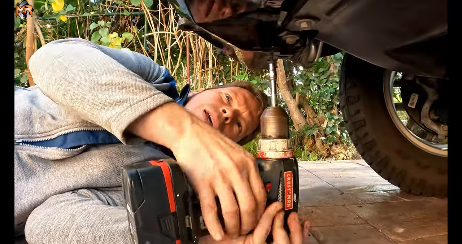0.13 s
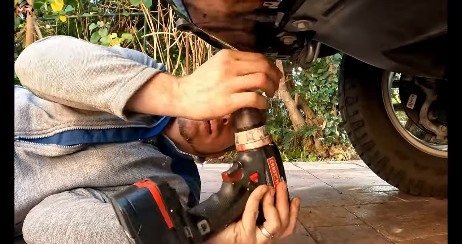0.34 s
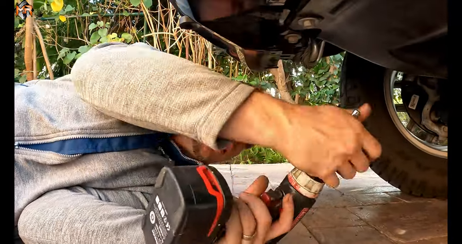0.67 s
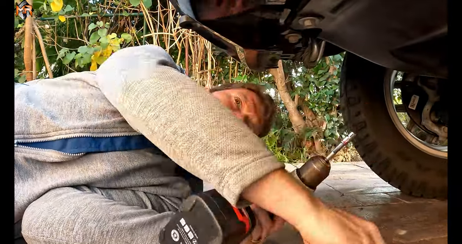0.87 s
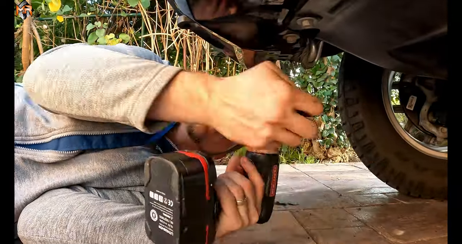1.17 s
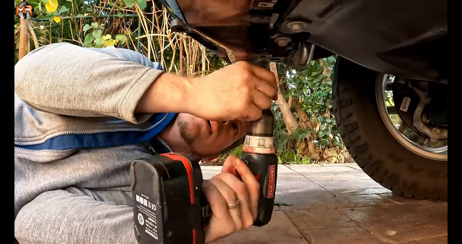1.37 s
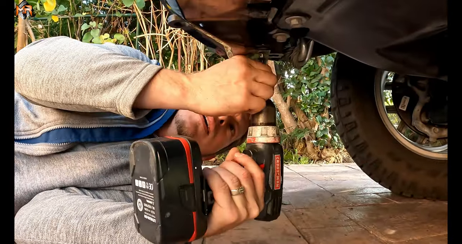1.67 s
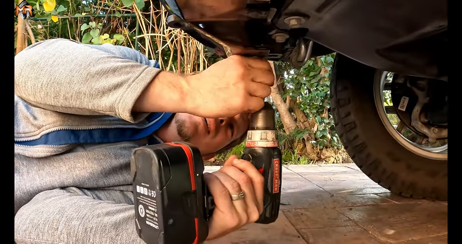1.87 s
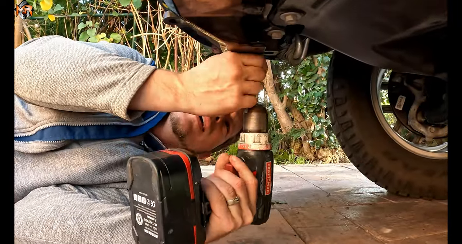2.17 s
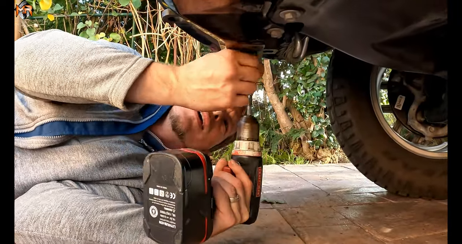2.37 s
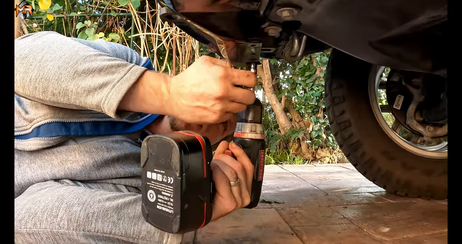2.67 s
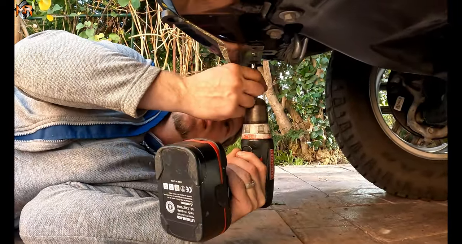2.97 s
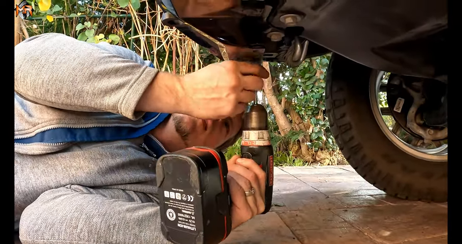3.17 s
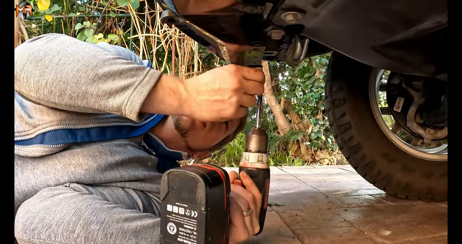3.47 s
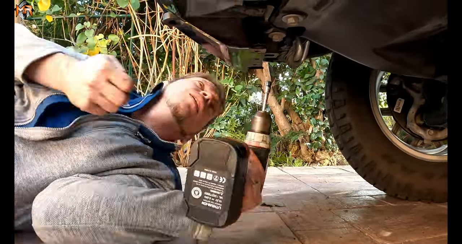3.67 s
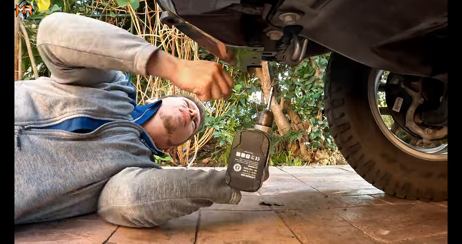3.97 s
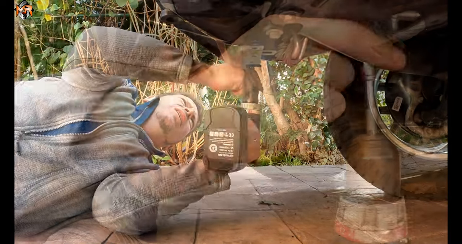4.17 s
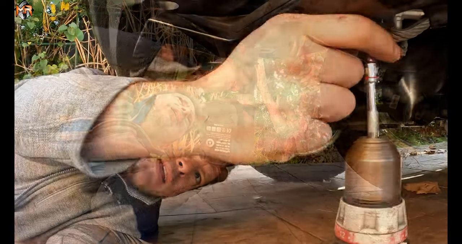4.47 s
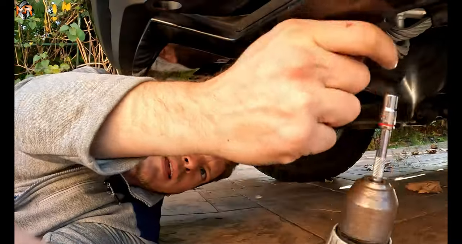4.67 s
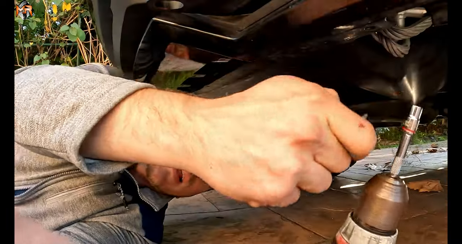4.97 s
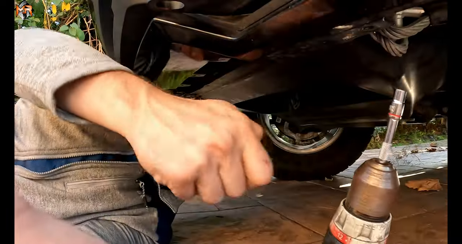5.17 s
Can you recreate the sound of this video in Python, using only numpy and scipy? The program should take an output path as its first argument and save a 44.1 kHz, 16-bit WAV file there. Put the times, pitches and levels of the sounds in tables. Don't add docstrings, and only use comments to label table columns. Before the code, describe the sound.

Outdoors on paving under a vehicle, a drill already spinning cuts off quickly, then hands knock socket and metal while wind rumbles. Two more short, whining bursts follow with clicks and hollow thumps. The view dissolves from a fast, smeared stereo distance to a close microphone, where a longer burst swells, brakes and coasts down before a bolt rattles sharply.

```python
import sys
import numpy as np
from scipy import signal
from scipy.fft import rfft, irfft, next_fast_len
from scipy.io import wavfile
from scipy.ndimage import uniform_filter1d, map_coordinates

SR = 44100
rng = np.random.default_rng(int(sys.argv[2]) if len(sys.argv) > 2 else 0)


def voltage_ratio(decibels):
    exponent = np.asarray(decibels, float) / 20
    return 10 ** exponent


def to_wav(sig):
    pcm = np.clip(np.atleast_2d(sig), -1, 1) * 32767
    pcm = np.round(pcm).astype(np.int16)
    wavfile.write(sys.argv[1], SR, pcm.T)


N = 234908
TIME = np.arange(N) / SR
FAST = next_fast_len(N)

SCENE_CHANGES_S = (1.27, 4.01)
DISSOLVE_S = (3.98, 4.06)
# start_s, left_minus_right_db, wind_left_minus_right_db
BALANCE = [(0.0, -0.5, 2), (3.41, -0.5, -8.5), (3.56, -0.5, -17.5), (3.84, -0.5, -11), (4.17, -2.5, -2),
           (4.81, -1.5, -0.5), (5.33, 0, -3)]
# freq_hz, left_minus_right_db
STEREO_TILT = [(300, 3), (600, 1), (1200, 1), (3000, -1), (9000, 2)]
# start_s, end_s, remaining_db
DROPOUTS = [
    (1.1413, 1.180, -80),
    (4.6722, 4.706, -64),
]

# start_s, end_s, start_level_db, end_level_db, upper_over_deep_db
GUSTS = [(0, 0.325, -52, -59.5, 7.5), (0.33, 1.156, -50.5, -57, 5), (1.168, 1.261, -53.5, -55.5, -2),
         (1.449, 1.709, -80, -68, -20.5), (1.69, 1.95, -73, -73, -23), (1.943, 2.22, -82, -86, -22),
         (2.44, 2.518, -88, -71, -19), (2.507, 2.621, -70, -69, 0), (2.635, 2.727, -84, -83, 0),
         (2.882, 3.313, -87, -67, 20), (3.3, 3.65, -86.5, -75, 28.5), (3.657, 4.06, -60.5, -69, 12),
         (4.05, 4.508, -67.5, -57.5, 14.5), (4.51, 4.82, -55, -53.5, 5), (4.813, 5.34, -50.5, -49, 6)]
# freq_hz, density_db_per_hz
DEEP_BUFFET = [(12, -46), (20, -0.5), (45, 5), (67, 7), (110, -6.5), (140, -16), (240, -120)]
UPPER_BUFFET = [(56, -61), (95, -1), (138, 1.5), (183, -3), (260, -16.5), (340, -19.5), (570, -120)]

# start_s, level_db
YARD_STIR = [(.24, -55.5), (.37, -71), (.82, -73.5), (1.13, -78), (1.22, -74.5), (1.4, -87), (1.68, -80),
             (2.36, -68), (2.48, -82), (2.64, -86), (2.79, -78), (3.04, -66.5), (3.58, -62), (3.83, -70.5),
             (4.05, -68.5), (4.95, -59), (5.06, -69.5), (5.33, -69.5)]
# freq_hz, density_db_per_hz
RUSTLE = [(200, -96.5), (470, -59), (800, -21), (1370, -13.5), (1570, -15.5), (1800, -17), (2500, -26.5),
          (3250, -36), (5500, -120)]
AIR = [(600, -71), (1350, -36), (2300, -2), (2720, -6.5), (3140, -0.5), (4080, -6), (5570, -3.5),
       (7010, -8), (11400, -20), (13600, -23), (15400, -50)]
MURK = [(70, -100), (150, -44), (250, -23), (394, -13.5), (515, -13.5), (663, -18), (900, -47), (1170, -43),
        (1980, -120)]
TRAFFIC = [(300, -61), (420, -8), (520, 5), (620, -11), (900, -63)]

# start_s, level_db, pitch_hz, t60_s
HOLLOW_THUMPS = [(1.645, -44, 419, 0.1), (1.675, -49, 421, 0.081), (1.96, -44, 418, 0.081),
                 (2.3, -50, 439, 0.058), (2.35, -53.5, 444, 0.065), (2.51, -50, 136, 0.17),
                 (2.68, -67, 378, 0.18), (4.49, -41.5, 305, 0.13), (4.72, -40, 433, 0.1),
                 (1.825, -63.5, 193, 0.21), (1.9, -61.5, 438, 0.63), (2.1, -50.5, 394, 0.14),
                 (2.86, -43, 377, 0.12), (2.88, -61, 143.4, 0.32), (3.05, -55, 375, 0.21),
                 (3.245, -37, 195, 0.11), (3.255, -40.5, 148.5, 0.24), (3.42, -42, 262, 0.16),
                 (3.47, -42.5, 436, 0.093), (3.657, -29.5, 141.7, 0.16), (3.74, -54.5, 80.3, 1),
                 (3.907, -35, 135, 0.28), (3.93, -42.5, 76, 0.66), (4.59, -36.5, 328, 0.12),
                 (4.65, -29.5, 312.5, 0.16), (5.074, -27, 610, 0.032), (5.076, -29.5, 432, 0.039),
                 (3.905, -49, 542, 0.12), (3.905, -50.5, 340, 0.13), (3.92, -43, 940, 0.066),
                 (2.68, -70, 232, 0.1), (2.69, -65, 85, 0.093), (4.2, -53.5, 143, .4), (4.42, -39, 137, .3),
                 (4.55, -47, 724, 0.089), (4.6, -39.5, 755, 0.082)]
# start_s, level_db, t60_s
SOCKET_RINGS = [
    (.4, -69, 0.086),
    (0.457, -36, 0.043),
    (.497, -43.5, 0.13),
]
# peak_s, level_db, centre_hz, length_s, treble_over_body_db
STEEL_TICKS = [(.397, -37.5, 2610, 0.0049, -0.5), (.462, -44.5, 3580, 0.0057, 3),
               (.503, -60, 4030, 0.012, 6), (.662, -51.5, 4130, 0.032, -2), (.685, -46.5, 2650, 0.0091, -1),
               (.755, -48.5, 3600, 0.0092, -8), (.949, -58, 2330, 0.027, -1),
               (1.049, -69, 4850, .022, 10.5), (1.362, -77, 4570, 0.018, 7), (1.485, -74, 3070, 0.013, -3),
               (1.797, -58, 3600, 0.018, -2), (2.322, -49, 3300, 0.0088, 2),
               (2.528, -49.5, 2250, 0.008, -4), (2.585, -76, 4000, 0.0091, 7),
               (2.645, -68, 3930, 0.015, -1), (2.803, -67, 7600, .004, 0), (2.848, -48, 3740, 0.0045, -4.5),
               (2.857, -37.5, 2890, 0.0023, -9.5), (3.536, -34.5, 2350, 0.027, -1.5),
               (3.755, -62, 5030, .008, -11), (3.975, -49.5, 4570, 0.021, -5.5),
               (4.045, -48.5, 4130, 0.0057, -9), (4.772, -44, 3120, 0.0064, -10),
               (3.097, -31.5, 3600, 0.0044, -21), (5.255, -56, 6300, 0.03, -12),
               (5.194, -58, 1300, .004, -25)]
BOLT_CLACKS = [(.102, -32, 1600, 0.0099, -29), (.132, -30.5, 1230, 0.0098, -15),
               (.159, -32, 1870, 0.012, -8), (.288, -38.5, 1470, 0.0045, -7.5),
               (.317, -39, 1430, 0.0076, -18), (.357, -37.5, 1340, 0.0085, -19),
               (.415, -50, 2370, 0.0056, -25), (.783, -42.5, 1510, 0.009, -10),
               (.801, -52.5, 2860, 0.0041, -5.5), (1.829, -33.5, 2660, 0.03, -39),
               (2.877, -38.5, 1870, 0.011, -42), (2.892, -50, 2000, 0.019, -33),
               (2.911, -43.5, 2660, 0.0022, -30), (2.918, -43, 1860, 0.016, -20),
               (3.06, -38.5, 2020, 0.013, -30), (3.656, -34.5, 2170, 0.027, -23),
               (3.907, -39.5, 2320, 0.037, -19.5), (4.725, -32, 4050, 0.071, -9.5)]
CHASSIS_BUMPS = [(.068, -31.5, 2000, 0.014, -8), (.279, -47, 1790, 0.0073, -3),
                 (.298, -35, 2500, 0.0039, -21), (.592, -59, 1190, 0.018, -3),
                 (.615, -55.5, 2500, 0.04, -2), (1.649, -50, 1350, 0.011, -4),
                 (1.68, -46, 1480, 0.012, -29), (1.741, -68, 2270, 0.0082, -3),
                 (2.69, -60.5, 2000, 0.027, -30), (3.83, -63.5, 1800, 0.031, -22),
                 (4.887, -41.5, 1770, 0.017, -18), (5.081, -56, 966, 0.014, -24)]
SOCKET_SNAPS = [(2.418, -44, 3600, 0.003, -11), (2.442, -55.5, 2130, 0.017, -4.5),
                (2.483, -59.5, 3370, 0.0075, -10), (2.547, -37, 2000, 0.01, -16),
                (2.615, -61, 1730, 0.049, -6), (2.739, -57, 2740, 0.0031, -17),
                (2.747, -42, 2000, 0.0057, -23), (2.82, -57.5, 1510, 0.019, -23),
                (3.43, -40, 1220, 0.018, -20), (3.46, -36.5, 3000, 0.018, -15),
                (3.487, -33.5, 2400, 0.007, -26)]
# freq_hz, density_db_per_hz
KNOCK_TREBLE = [(2650, -15), (4500, 6), (5040, 1), (6520, 6), (8700, -4), (9900, -1.5), (11700, -6),
                (13600, -12.5), (15400, -37.5)]
# start_s, level_db
CLINKS = [(5.103, -67), (5.1254, -64), (5.2137, -38), (5.2228, -33.5), (5.2305, -44), (5.2358, -46),
          (5.249, -47), (5.2587, -54), (5.2648, -49)]
# pitch_hz, level_db, t60_s
BOLT_MODES = [(4450, -12, .015), (4800, -9, .015), (6450, -6, .045), (7400, -12, .02)]
# freq_hz, density_db_per_hz
CLINK_CRACK = [(700, -43), (1500, -20), (3000, -7), (4500, -3), (6500, 2.5), (7700, -2), (9000, -17),
               (12000, -21), (15000, -49)]

# start_s, end_s
RUNNING = [
    (0, .29),
    (1.75, 2.43),
    (3.01, 3.66),
    (3.98, 5.18),
]
# time_s, shaft_hz
SHAFT_SPEED = [
    [(0, 262), (.128, 250)],
    [(1.805, 190), (1.88, 206), (1.95, 209), (2.01, 228), (2.05, 238), (2.1, 243), (2.17, 245), (2.21, 241),
     (2.25, 224)],
    [(3.045, 184), (3.1, 228), (3.2, 238), (3.24, 248), (3.28, 250), (3.5, 248.4)],
    [(3.99, 237), (4.08, 242), (4.3, 246), (4.4, 249), (4.5, 251), (4.64, 252.5), (4.711, 253)],
]
# gear_level_db, attack_s, sag_db_per_s, coasting_hum_db
BURSTS = [
    (-32.5, 0.00067, 63, -46),
    (-31.5, 0.042, 13.5, -68),
    (-31, 0.063, 14.5, -71),
    (-35.5, 0.35, -3.5, -42),
]
# shaft_multiple, level_db
TOP_TEETH = [
    (28, -14),
    (29, -6),
    (28, -7),
    (28, -15),
]
# shaft_multiple, level_db
TOOTH_WHINE = [(5, -20), (8, -23), (12, -2), (13, -20), (15, -11.5), (16, -21), (20, -19)]
LOW_HUM = [(4, -4), (8, -5), (12, -2), (16, -1)]
# time_s, level_db
SINGING = [(0, -55), (.13, -65), (1.8, -68), (1.9, -54), (2.0, -44), (2.2, -38.5), (2.28, -63), (3.04, -70),
           (3.19, -45), (3.26, -41), (3.47, -46), (3.53, -58), (3.99, -71), (4.03, -63.5), (4.2, -53),
           (4.42, -40), (4.67, -33), (4.8, -54)]
# freq_hz, density_db_per_hz
GEARS_FAR = [(200, -100), (470, -31), (900, -19.5), (1010, -10.5), (1250, -9.5), (1560, -13), (2510, -4.5),
             (3690, -2), (4300, -9.5), (5590, -6.5), (7200, -12), (9000, -24.5), (11700, -63),
             (19800, -120)]
GEARS_NEAR = [(470, -24), (800, -21.5), (1220, -6.5), (1350, -10), (1970, -3), (2540, -5.5), (2920, -1.5),
              (3540, -3), (7130, -9), (9000, -29), (11700, -78), (19800, -120)]
BRUSHES = [(4590, -20.5), (7800, -9.5), (8970, -12), (10200, 0.5), (11000, -7), (12000, -1), (13100, -16.5),
           (14200, -18), (14900, -28), (15100, -45), (15400, -53.5)]
HOUSING_DRONE = [(140, -69.5), (230, -2.5), (324, -6.5), (415, -0.5), (510, -1.5), (543, -5.5), (880, 0),
                 (1140, -0.5), (1940, -120)]
# pitch_hz, width_hz, level_db
FIRST_CASING = [(2120, 29, -6), (3100, 200, -4), (3320, 36, -0.5), (3870, 92, -6), (5040, 58, -21),
                (5270, 41, -2.5), (5540, 44, 0), (6850, 120, -9), (7250, 100, -11)]
SECOND_EARLY = [(2130, 40, -2), (2500, 70, -2), (3190, 72, -1), (3600, 27, -18), (3940, 77, -11),
                (4550, 67, 0), (4840, 58, 5), (5870, 260, -13), (7730, 170, -19)]
SECOND_LATE = [(2500, 61, 1), (3420, 47, 3), (3600, 76, -10), (3980, 33, -1), (4960, 64, -3),
               (5460, 31, -16), (5850, 200, -6.5), (7230, 200, -2.5)]
THIRD_EARLY = [(2460, 37, 1), (2520, 40, 0), (2870, 36, -6), (3450, 68, 4.5), (3780, 60, 3.5),
               (4980, 170, -5), (5450, 86, -23), (6230, 130, -9), (7050, 120, -18)]
THIRD_LATE = [(2000, 94, -6), (2470, 50, -7), (2740, 30, -6), (3360, 62, 3.5), (3590, 24, -10.5),
              (4700, 93, -4.5), (5040, 110, -9.5), (5500, 50, 1), (5730, 50, 1.5), (7530, 82, -7)]
COAST_POWER = 1.785


def unit(x):
    return x / np.sqrt(np.mean(x ** 2) + 1e-20)


def along(points, hz):
    f, v = np.transpose(points)
    return np.interp(np.log(hz + 1), np.log(f + 1), v)


def curves(rows):
    s, *cols = np.transpose(rows)
    return [np.interp(TIME, s, c) for c in cols]


def by_scene(values):
    return np.asarray(values)[np.searchsorted(SCENE_CHANGES_S, TIME)]


def nearness():
    return np.interp(TIME, DISSOLVE_S, [0, 1])


def wobble(rate):
    return map_coordinates(rng.standard_normal(int(N * rate / SR) + 4), [TIME * rate])


def noise(spectrum, size=FAST):
    white = rfft(rng.standard_normal(size))
    colour = voltage_ratio(along(spectrum, np.fft.rfftfreq(size, 1 / SR)))
    return unit(irfft(white * colour, size)[:N])


def field(shape, bins, frames):
    smooth = uniform_filter1d(rng.standard_normal(shape), bins, 0)
    return unit(uniform_filter1d(smooth, frames, 1))


def patchy(x, patchy_db):
    z = signal.stft(x, nperseg=2048, noverlap=1536)[2]
    z = z * voltage_ratio(patchy_db * field(z.shape, bins=2, frames=7))
    return unit(signal.istft(z, nperseg=2048, noverlap=1536)[1][:N])


def loosened(x, fast_rad, near_rad, bins, tilt=((1, 0),), frames=36):
    f, t, z = signal.stft(x, SR, nperseg=1024, noverlap=768)
    drift = np.interp(t, DISSOLVE_S, [fast_rad, near_rad]) * field(z.shape, bins, frames)
    lean = voltage_ratio(along(tilt, f)[:, None] / 2) * np.exp(1j * drift)
    return signal.istft(z * np.array([lean, 1 / lean]), nperseg=1024, noverlap=768)[1][:, :N]


def lasting(start, end):
    edge_s = .03
    return np.clip(np.minimum(TIME - start, end - TIME) / edge_s + .5, 0, 1) ** 2


def wind():
    deep = upper = voltage_ratio(-104)
    for start, end, start_db, end_db, tilt_db in GUSTS:
        gust = lasting(start, end) * voltage_ratio(np.interp(TIME, [start, end], [start_db, end_db]))
        deep = deep + gust * voltage_ratio(-tilt_db / 2)
        upper = upper + gust * voltage_ratio(tilt_db / 2)
    lumps = voltage_ratio(1.6 * wobble(27))
    deep_noise = unit(lumps * noise(DEEP_BUFFET))
    upper_noise = unit(lumps * patchy(noise(UPPER_BUFFET), patchy_db=2.0))
    return deep * deep_noise + upper * voltage_ratio(-7.0) * upper_noise


def yard():
    stir_db, = curves(YARD_STIR)
    sleeve_s, sleeve_db, fall_db_per_s = 5.17, -56.5, 14
    sleeve = lasting(sleeve_s, 2 * sleeve_s) * voltage_ratio(sleeve_db - fall_db_per_s * (TIME - sleeve_s))
    rustle = patchy(noise(RUSTLE), patchy_db=4.0)
    air = patchy(noise(AIR), patchy_db=-2.5)
    murk_level = voltage_ratio(stir_db + by_scene((-2.5, -13.5, 0))) + voltage_ratio(-14) * sleeve
    traffic = lasting(1.284, 1.515) * voltage_ratio(-87) * noise(TRAFFIC)
    stir = voltage_ratio(stir_db) * (rustle + voltage_ratio(-0.5) * air) + murk_level * noise(MURK) + traffic
    return voltage_ratio(1.7 * wobble(17)) * (stir + sleeve * rustle)


def rings(table, attack):
    distant_end_s = 4.012
    out = np.zeros(N)
    for s, db, hz, t60 in table:
        t = np.clip(TIME - s, 0, None)
        lasts = np.clip((distant_end_s - TIME) / 0.011, 0, 1) if s < distant_end_s else 1
        level = voltage_ratio(db - 60 * t / t60 + 2.2 * wobble(27))
        out += lasts * level * (1 - np.exp(-t / attack)) * np.sin(2 * np.pi * hz * t)
    return out


def knocks(table, low_db):
    size, lead = 4096, 1024
    low_colour = [(220, -61.0), (380, 9.5), (560, 9), (800, 10.5), (1100, -29)]
    out = np.zeros(N + size)
    t = (np.arange(size) - lead) / SR
    for s, db, hz, length, treble_db in table:
        body = noise([(150, -90), (600, -40), (900, -12), (max(hz * 0.43, 920), -6), (hz, 0), (hz * 1.5, -6),
                      (max(hz * 1.1, 5200), -17), (max(hz * 2, 7000), -40)], size)
        modes_hz = hz * np.exp(rng.normal(0, .15, 4))
        clank = sum(np.sin(2 * np.pi * (f * t + p)) for f, p in zip(modes_hz, rng.random(4)))
        mix = body + voltage_ratio(-13.5) * np.exp(-np.abs(t) / .008) * clank
        mix += voltage_ratio(treble_db) * noise(KNOCK_TREBLE, size) + voltage_ratio(low_db) * noise(low_colour, size)
        swell = np.exp(-np.abs(t / (length * np.where(t < 0, .45, .7))) ** 1.07)
        strike = .8 * np.exp(-(t / .0025) ** 2)
        echo = voltage_ratio(-33.5) * np.exp(-np.abs(t) / 0.073) * (t > 0)
        out[round(s * SR) - lead:][:size] += voltage_ratio(db - 5.5) * (swell + echo + strike) * mix
    return out[:N]


def clinks():
    size = 4096
    out, t = np.zeros(N + size), np.arange(size) / SR
    for s, db in CLINKS:
        ring = np.zeros(size)
        for hz, level_db, t60 in BOLT_MODES:
            ring += voltage_ratio(level_db + rng.normal(0, 2.5) - 60 * t / t60) * np.sin(2 * np.pi * hz * t)
        crack_and_rasp = voltage_ratio(-60 * t / 0.0045) + voltage_ratio(-14 - 60 * t / 0.075)
        crack = noise(CLINK_CRACK, size) * crack_and_rasp
        out[round(s * SR):][:size] += voltage_ratio(db) * (voltage_ratio(-2.5) * ring + crack)
    return out[:N] * voltage_ratio([[0.5], [-0.5]])


def running():
    return uniform_filter1d(sum(1. * (TIME >= a) * (TIME < b) for a, b in RUNNING), size=600)


def drive():
    driven, = curves(sum(SHAFT_SPEED, []))
    press, release = np.transpose([(c[0][0], c[-1][0]) for c in SHAFT_SPEED])
    release_hz = np.array([c[-1][1] for c in SHAFT_SPEED])
    which = np.clip(np.searchsorted(press, TIME) - 1, 0, None)
    db, attack, sag, hum_db = np.array(BURSTS)[which].T
    coast_s = np.array((.1, .095, .085, .18))[which]
    since = np.clip(TIME - press[which], 0, None)
    after = np.clip(TIME - release[which], 0, None)
    swell_db = 1.213 * 20 * np.log10(1.001 - np.exp(-since / attack))
    level_db = db - sag * (since - after) + swell_db
    speed = np.where(after > 0, release_hz[which], driven)
    hum_db = np.where(after > 0, hum_db, -120)
    return speed, np.exp(-after / coast_s), level_db, np.array(TOP_TEETH)[which].T, hum_db


def motor():
    driven, left, _, (top_order, top_db), hum_db = drive()
    bite = np.clip(TIME - 4.718, 0, None) / .03
    bite = bite * np.exp(1 - bite)
    drag = by_scene((.15, 0, .1))
    coasting = np.clip((1 + drag) * left ** by_scene((.8, 1, .905)) - drag, .01, 1)
    speed = driven * coasting * (1 - .1 * bite)
    whine_db = curves(SINGING)[0] + 6 * bite - 3.1 * np.clip(168 - speed, 0, None)
    hum_db = hum_db - by_scene((30, 13, 6)) * np.log(speed / 110) ** 2
    hum_db = hum_db - .45 * np.clip(speed - 170, 0, None)
    shaken = speed * (1 + by_scene((.003, .002, .0007)) * wobble(40))
    turn = 2 * np.pi * np.cumsum(shaken) / SR
    rotor = voltage_ratio(0.4 * whine_db - 39 + 1.5 * wobble(25)) * (speed > 180) * np.sin(2 * turn)
    out = nearness() * rotor
    top_db = top_db - 20 * np.log10(1 + (2 * (top_order * speed - 7050) / 300) ** 2)
    breaks_db = by_scene((2.5, 1.3, .6))
    for order, db in TOOTH_WHINE + [(top_order, top_db)]:
        out += voltage_ratio(whine_db + db + breaks_db * wobble(45)) * np.sin(order * turn)
    cavity_hz, cavity_width_hz = 420, 330
    for order, db in LOW_HUM:
        cavity = 1 / (1 + (2 * (order * speed - cavity_hz) / cavity_width_hz) ** 2) ** 2
        hum = np.sin(order * turn + 0.2 * wobble(36))
        out += cavity * voltage_ratio(hum_db + db + 2.4 * wobble(37)) * hum
    return running() * out


def casing():
    f = np.fft.rfftfreq(FAST, 1 / SR)
    white = rfft(rng.standard_normal(FAST))
    sets = (FIRST_CASING, SECOND_EARLY, SECOND_LATE, THIRD_EARLY, THIRD_LATE)
    alone_s = (.3, 1, 1.1, 1.95, 2.08, 2.7, 2.8, 3.18, 3.32)
    out = np.zeros(N)
    for table, share in zip(sets, np.eye(len(sets))):
        modes = sum(voltage_ratio(db) / (1 + (2 * (f - c) / w) ** 2) for c, w, db in table)
        fade = np.sqrt(np.interp(TIME, alone_s, np.repeat(share, [2, 2, 2, 2, 1])))
        out += fade * unit(irfft(white * modes, FAST)[:N])
    return out


def gears():
    near = nearness()
    chatter = voltage_ratio(2.2 * wobble(700) + .8 * wobble(150) + .25 * wobble(40))
    far_mesh = patchy(noise(GEARS_FAR) + voltage_ratio(-6) * casing(), patchy_db=-0.94)
    near_mesh = patchy(noise(GEARS_NEAR), patchy_db=2.5)
    mesh = unit(chatter * ((1 - near) * far_mesh + near * near_mesh))
    hiss = unit(chatter * noise(BRUSHES))
    drone = unit(voltage_ratio(1.6 * wobble(38)) * patchy(noise(HOUSING_DRONE), patchy_db=3.0))
    driven, left, level_db, *_ = drive()
    hiss_db = -15 - 0.14 * np.clip(241 - driven, 0, None)
    extra_db = np.clip(level_db + 35.5, -20, 20)
    drone_db = by_scene((-10.5, -37, -12.5)) + by_scene((0, -0.17, 0.81)) * extra_db
    drone = voltage_ratio(drone_db) * left ** (-COAST_POWER * 0.14) * drone
    hiss = voltage_ratio(hiss_db) * left ** 0.13 * hiss
    return running() * voltage_ratio(level_db) * left ** COAST_POWER * (voltage_ratio(-1.5) * mesh + hiss + drone)


def scene():
    lean_db, wind_lean_db = curves(BALANCE)
    side = np.array([[.5], [-.5]])
    low = loosened(wind(), fast_rad=1.6, near_rad=.5, bins=60, frames=110)
    panel = loosened(rings(HOLLOW_THUMPS, attack=0.011), fast_rad=.6, near_rad=.25, bins=60, frames=110)
    socket = rings([(s, db, 13230, t60) for s, db, t60 in SOCKET_RINGS], attack=0.0021)
    hands = knocks(STEEL_TICKS, low_db=-25) + knocks(BOLT_CLACKS, low_db=-18)
    hands += knocks(CHASSIS_BUMPS, low_db=-7.5) + knocks(SOCKET_SNAPS, low_db=-35.5)
    noises = loosened(gears() + hands + yard(), fast_rad=1.9, near_rad=.35, bins=5, tilt=STEREO_TILT)
    tones = loosened(motor(), fast_rad=.9, near_rad=.25, bins=60, tilt=STEREO_TILT)
    work = (panel + noises + tones) * voltage_ratio(3 + side * lean_db)
    return work + socket + low * voltage_ratio(3 + side * wind_lean_db) + clinks()


def band_limit(x):
    return signal.sosfilt(signal.butter(12, 15570, fs=SR, output="sos"), x)


def record(dry):
    gate = np.ones(N)
    for start, end, left_db in DROPOUTS:
        gate[round(start * SR):round(end * SR)] = voltage_ratio(left_db)
    mix = dry * uniform_filter1d(gate, size=140)
    return band_limit(mix)


dry = scene()
out = record(dry)
to_wav(out)
```